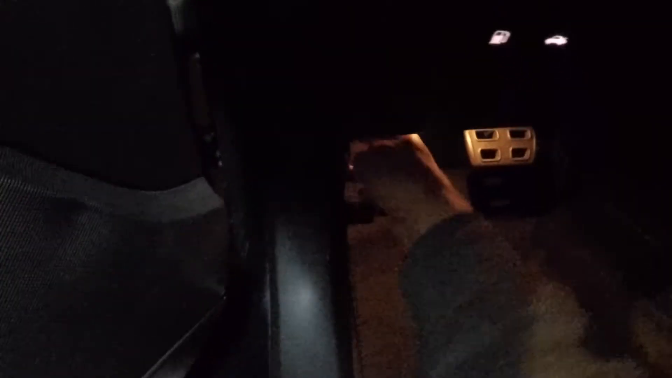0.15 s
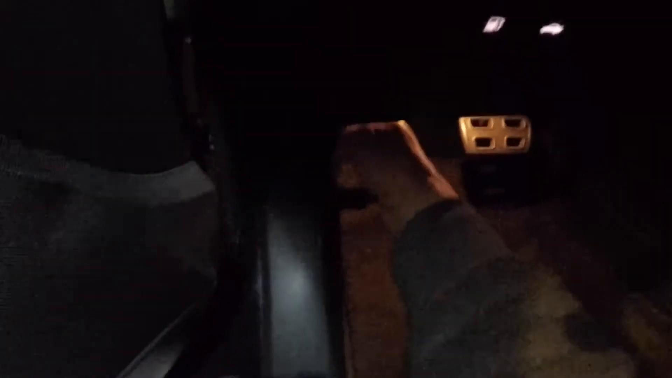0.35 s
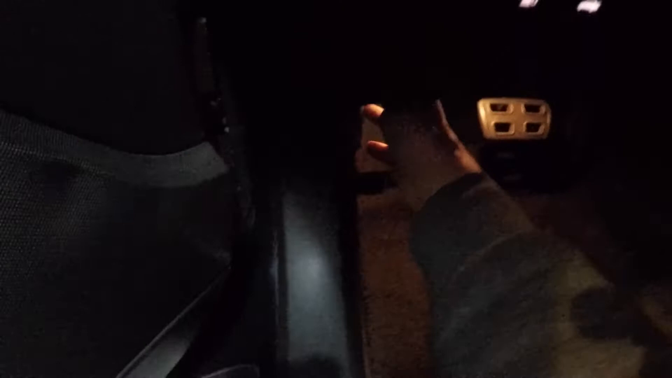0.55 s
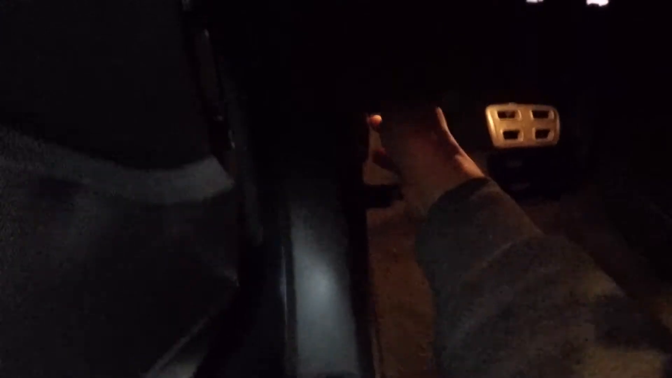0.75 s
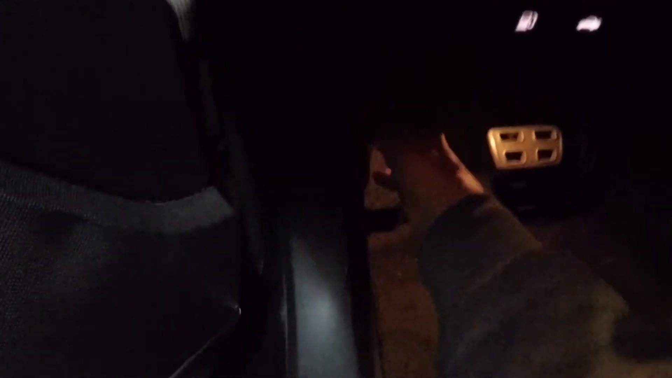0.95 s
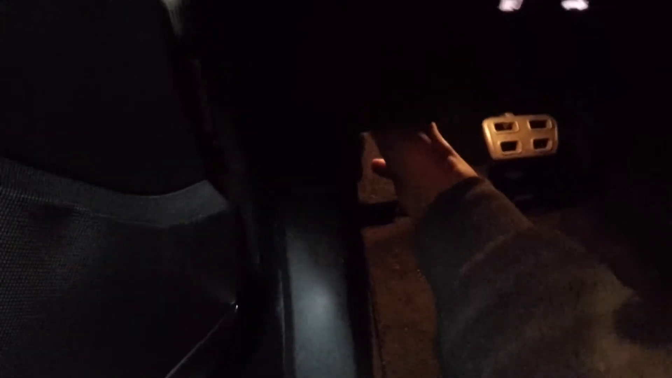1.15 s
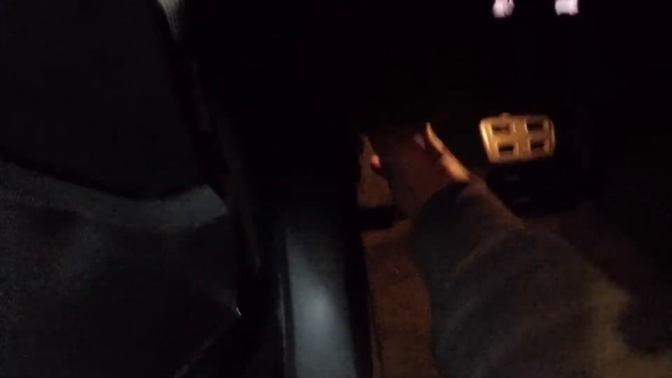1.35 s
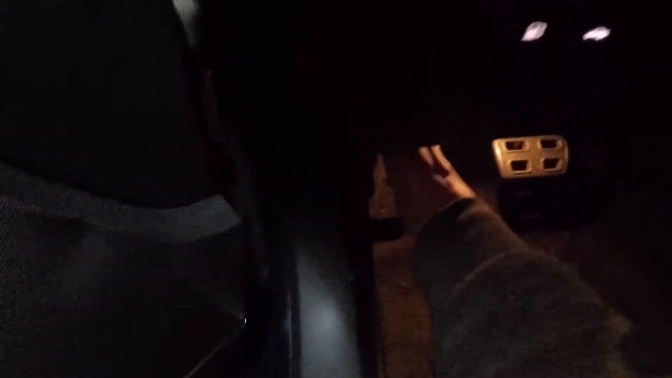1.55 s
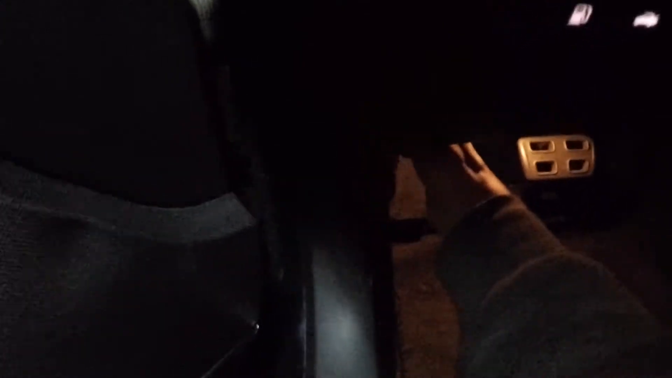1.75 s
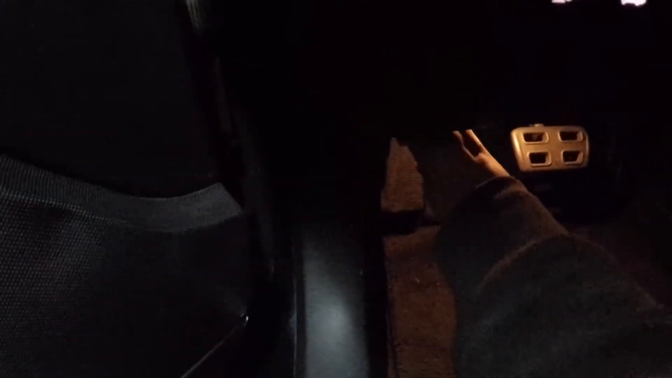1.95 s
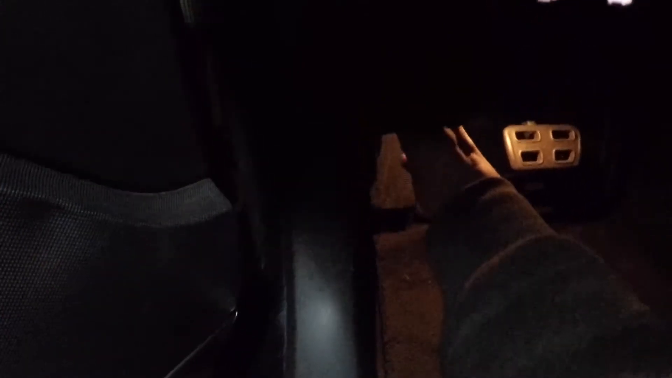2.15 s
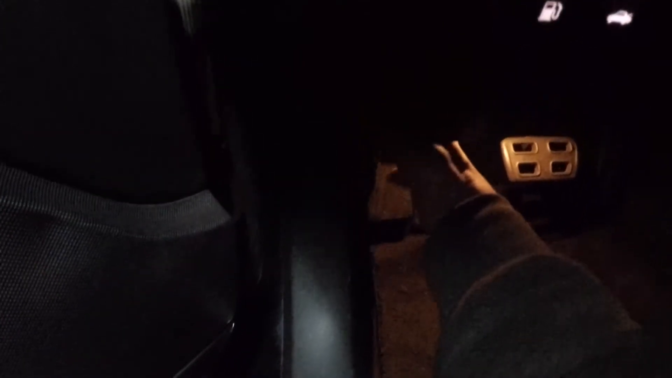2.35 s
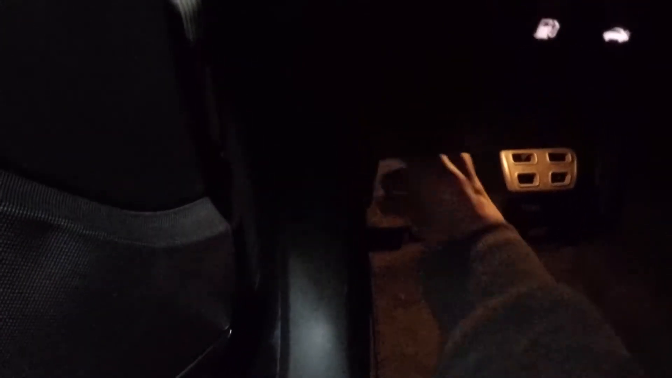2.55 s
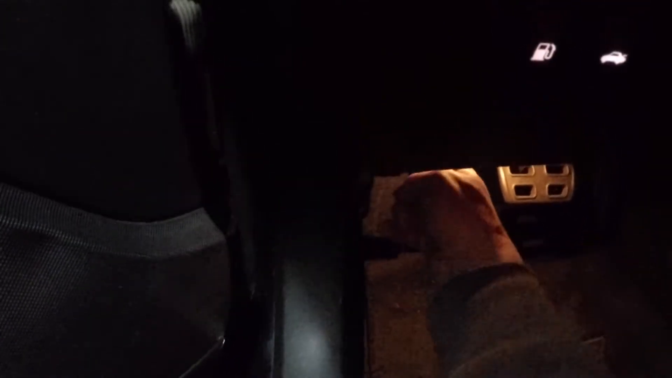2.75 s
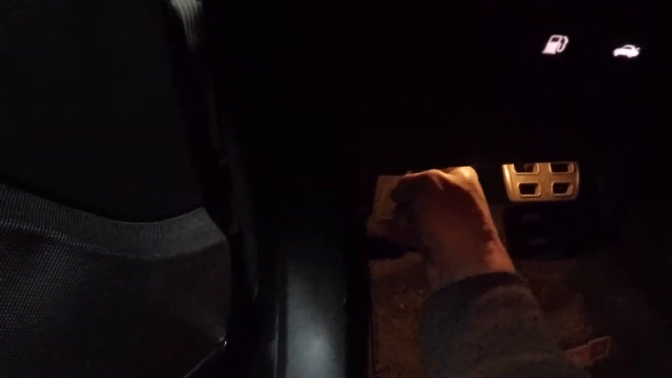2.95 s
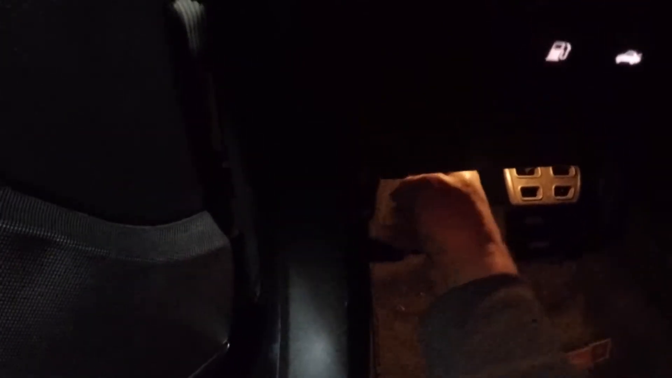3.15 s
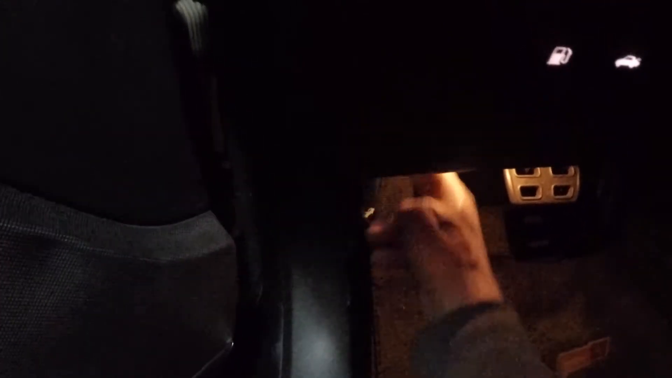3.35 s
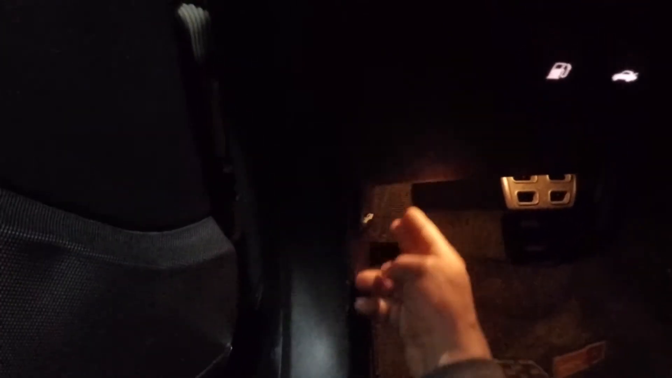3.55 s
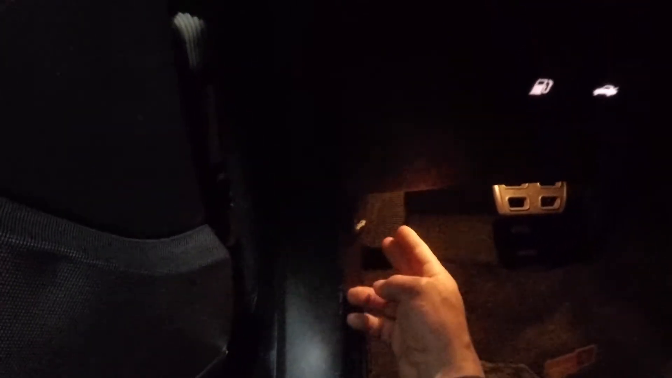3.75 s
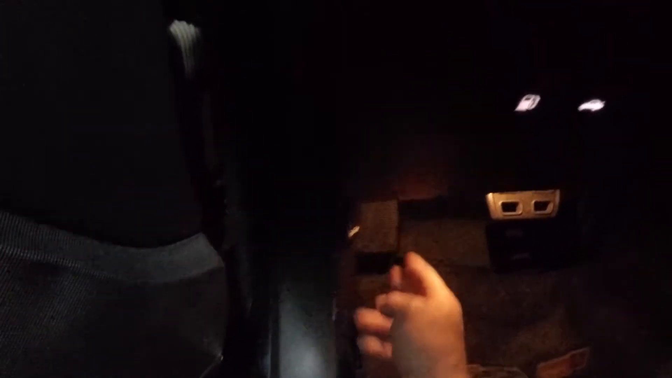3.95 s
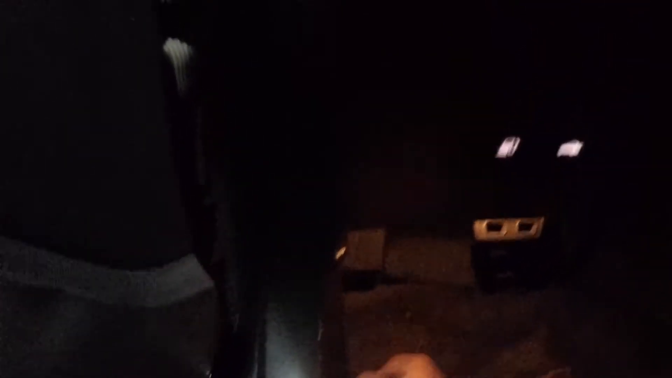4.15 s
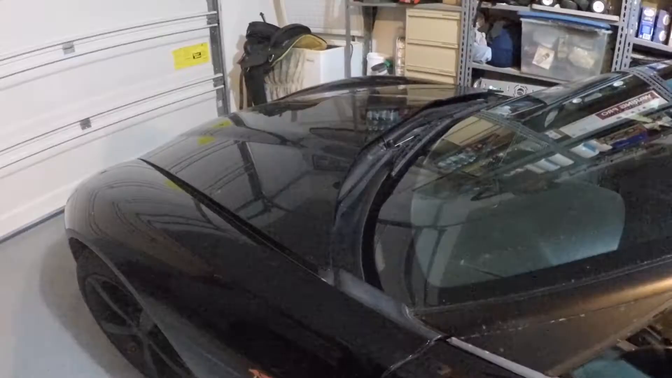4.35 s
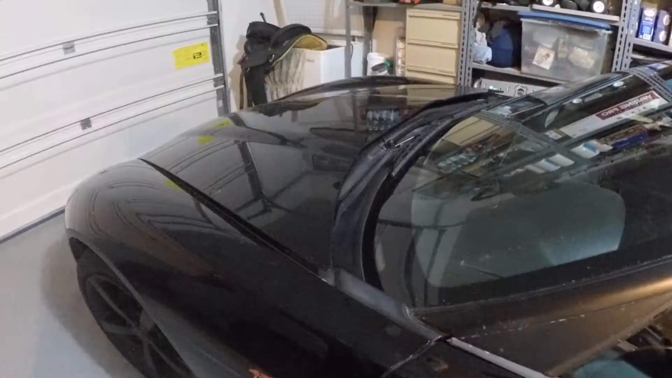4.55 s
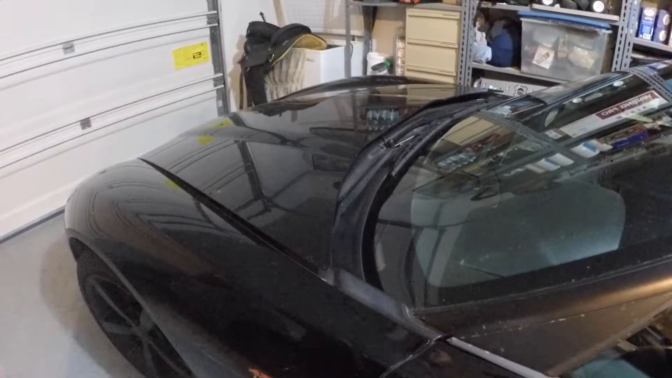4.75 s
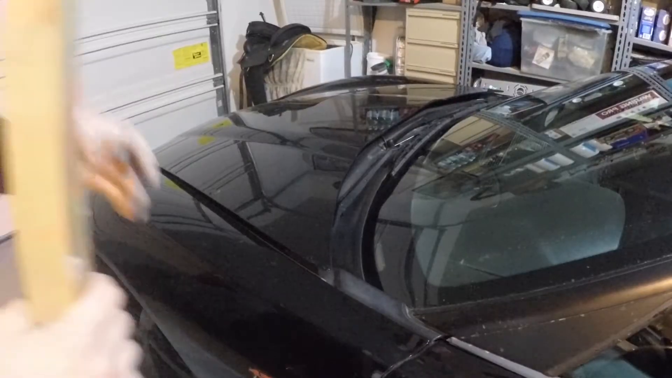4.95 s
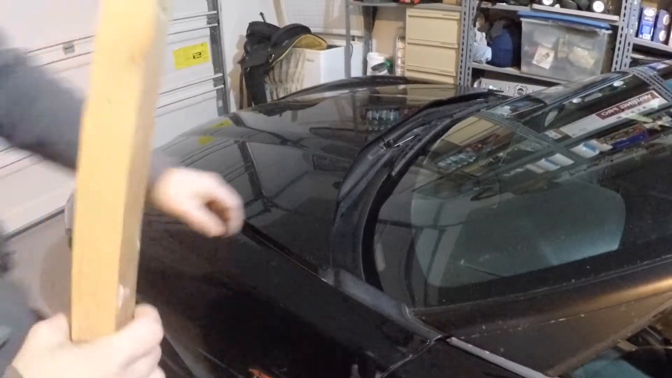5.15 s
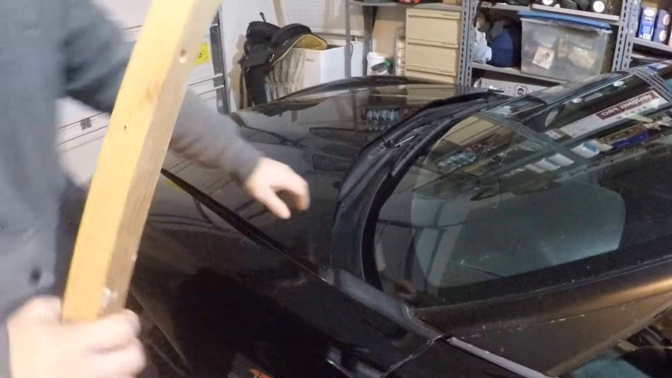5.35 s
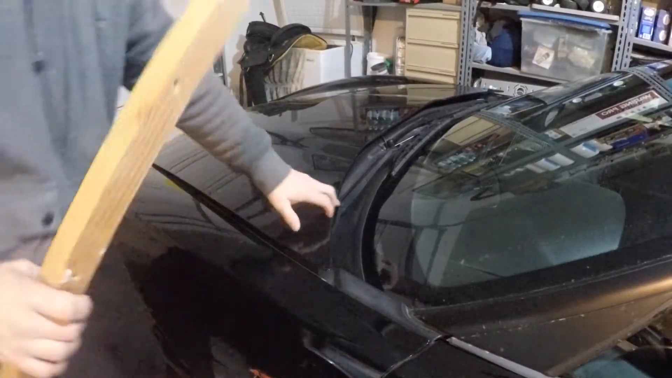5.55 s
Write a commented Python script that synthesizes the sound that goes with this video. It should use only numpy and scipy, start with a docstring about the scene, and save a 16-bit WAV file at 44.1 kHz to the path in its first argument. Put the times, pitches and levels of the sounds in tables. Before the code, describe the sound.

Quiet plastic clicks and handling creaks lead to a booming hood release, a harsh lever crack, then soft shoe steps on concrete.

```python
"""A hand gropes under a car's dashboard in a garage: plastic contacts click as damped noise bursts, the sleeve
rubs as modulated noise, and the grip on the camera creaks in stick-slip ticks and thuds. The cable frees the
latch and the hood jumps up: low panel modes boom while steel clanks, grinds and rattles. The lever then snaps
back on its stop as a hard burst with ringing modes, close enough to overload the microphone. Last, shoes land
and scuff on the concrete as low bursts, broad friction noise and wavering squeaks."""
import sys
import numpy as np
from scipy import signal
from scipy.fft import rfft, irfft, next_fast_len
from scipy.io import wavfile
from scipy.ndimage import map_coordinates

SR = 44100
rng = np.random.default_rng(int(sys.argv[2]) if len(sys.argv) > 2 else 0)


def wav_record(signal):
    """Record a signal, one row per channel, as 16-bit PCM in the file named by sys.argv[1]."""
    frames = np.transpose(np.atleast_2d(signal))
    bounded = np.clip(frames, -1, 1)
    # unit amplitude maps onto the largest positive 16-bit level
    quanta = np.round(bounded * 32767).astype(np.int16)
    wavfile.write(sys.argv[1], SR, quanta)


N = 246519  # length in samples

# the hood jumping against its catch: t/s, boom level/dB, clunk level/dB, clank level/dB, clatter level/dB
HOOD_JOLTS = [(2.5899, -23, -18, -17.5, -39), (2.607, -19.5, -22.5, -26.5, -41),
              (2.632, -24, -27, -31, -41.5), (2.645, -16.5, -31.5, -38, -50), (2.667, -20, -16, -28, -27),
              (2.672, -35, -26, -28.5, -19), (2.7214, -18, -23, -18, -33), (2.7377, -20, -26.5, -26, -33.5),
              (2.7656, -20.5, -36, -33.5, -24), (2.803, -24.5, -38.5, -46.5, -43)]
# spectrum of a plastic click: f/Hz, level/dB
CLICK_COLOUR = [(60, -39.5), (200, -24), (550, 1), (800, -4.5), (1120, 2.5), (1400, 1.5), (1900, -1),
                (2400, -5), (3050, -3), (3600, -18.5), (4600, -13), (8000, -24), (16000, -53)]
# spectrum of a bright snap: f/Hz, level/dB
SNAP_COLOUR = [(1500, -35.5), (4000, -0.5), (6500, -3.5), (10000, -5), (15000, -16.5)]
# spectrum of bright friction hiss: f/Hz, level/dB
HISS_COLOUR = [(1500, -14.5), (3500, 1), (6000, -0.5), (10000, -1.5), (12500, -6), (15500, -9.5)]
# stereo width of the sources at the two microphone ports: f/Hz, side re mid level/dB
PORT_WIDTH = [(30, -4), (100, -12), (300, -20.5), (700, -14.5), (1400, -9.5), (2300, -4.5), (4300, 2),
              (8000, -0.5), (15000, 4)]
# stereo width of still air and handling noise: f/Hz, side re mid level/dB
DIFFUSE_WIDTH = [(30, -2), (100, -7), (300, -8), (1000, -0.5), (2400, -3), (4400, 0), (15000, -0.5)]


def amp(db):
    """Level to amplitude: 20 dB is a factor of ten."""
    return 10 ** (np.asarray(db) / 20)


def unit(x):
    """Normalization to a root-mean-square of 1."""
    return x / np.sqrt(np.mean(x ** 2) + 1e-20)


def along(points, hz):
    """Interpolation of (f/Hz, value) points along a logarithmic frequency axis."""
    f, v = np.transpose(points)
    return np.interp(np.log(hz + 1), np.log(f + 1), v)


def add(track, s, sound):
    """Superposition: a sound is summed into the track from time s."""
    part = track[:, max(round(s * SR), 0):][:, :sound.shape[-1]]
    part += sound[..., :part.shape[1]]


def wobble(rate):
    """Random modulation: straight lines between Gaussian knots, rate knots a second."""
    knots = rng.standard_normal(1024)
    return map_coordinates(knots, [np.arange(N) * rate / SR], order=1, mode="wrap")


def noise(colour, size, width=PORT_WIDTH):
    """Random-phase synthesis: coloured noise of rms 1, with independent mid and side signals."""
    m = next_fast_len(size, real=True)
    hz = np.fft.rfftfreq(m, 1 / SR)
    # the angle shares power between mid and side
    turn = np.arctan(amp(along(width, hz)))
    gain = amp(along(colour, hz)) * [np.cos(turn), np.sin(turn)]
    spectrum = gain * np.exp(2j * np.pi * rng.random(gain.shape))
    mid, side = irfft(spectrum, m)[:, :size]
    return unit(np.array([mid + side, mid - side]))


def burst(colour, t60, rise, size=4096):
    """High modal density: a blow on many close modes is noise that swells quickly and decays exponentially."""
    t = np.arange(size) / SR
    return noise(colour, size) * amp(-60 * t / t60) * (1 - np.exp(-t / rise))


def ring(modes, rise, scatter_db, detune, size=16384):
    """Modal superposition: a blow excites damped sines, each with random level and slight pitch shift."""
    t = np.arange(size) / SR
    hz, db, t60 = np.transpose(modes)[:, :, None]
    level, shift = rng.standard_normal((2, len(modes), 1))
    envelope = amp(db + scatter_db * level - 60 * t / t60)
    waves = envelope * np.sin(2 * np.pi * hz * (1 + detune * shift) * t)
    return waves.sum(0) * (1 - np.exp(-t / rise))


def arch(start, length):
    """Stroke pressure: the square root of half a sine swells and eases off."""
    phase = np.clip((np.arange(N) / SR - start) / length, 0, 1)
    return np.sqrt(np.abs(np.sin(np.pi * phase)))


def hood():
    """Impact excitation: the spring throws the hood at its safety catch; panel modes boom, steel clatters."""
    # modes of the hood panel: f/Hz, level/dB, t60/s
    panel_modes = [(26.7, 0, 0.16), (44.8, -10, 0.29), (65.6, -4, 0.18), (78.8, 1, 0.23), (105.3, -1, 0.15),
                   (239.4, -13, 0.18), (329, -23.5, 0.27)]
    # spectrum of the dull clunk: f/Hz, level/dB
    clunk_colour = [(30, -0.5), (120, 0.5), (250, 0.5), (480, -2.5), (620, -8.5), (760, -7), (950, -13.5),
                    (1140, -11.5), (1400, -19), (2200, -21), (3500, -26.5), (8000, -34.5), (16000, -59.5)]
    # modes of the steel catch: f/Hz, level/dB, t60/s
    catch_modes = [(230, -3.5, .22), (414, -5, 0.059), (459.4, -4, .15), (723, -8.5, .15),
                   (1145, -11.5, .15), (1810, -18, 0.18), (2100, -18, 0.15), (3060, -20, 0.09)]
    # spectrum of steel meeting steel: f/Hz, level/dB
    clank_colour = [(200, -18.5), (500, -5), (760, 5), (930, -2.5), (1130, -3.5), (1450, -9.5), (1900, -10),
                    (2600, -20.5), (5000, -35), (15000, -52)]
    # spectrum of the clatter: f/Hz, level/dB
    clatter_colour = [(300, -20), (900, -8.5), (1700, 0.5), (2500, -3), (3050, 0.5), (3800, -5),
                      (4500, 0.5), (6500, -4), (9000, -3), (12000, -11.5), (15500, -13.5)]
    # modes of the latch's pawl and spring: f/Hz, level/dB, t60/s
    pawl_modes = [(1240, -6.5, .14), (1470, -6.5, .22), (1809, -6.5, .25), (2126, -2.5, .25),
                  (2600, -7.5, 0.13), (2870, -6.5, 0.17), (3106, -1, .16), (4450, -6, 0.073),
                  (5100, -8, .08)]
    catch_db, pawl_db = -7.5, -15  # ring gains added to the clunk and clatter levels

    panel, steel = np.zeros((2, N)), grinding()
    for s, boom_db, clunk_db, clank_db, clatter_db in HOOD_JOLTS + rebounds(count=2):
        add(panel, s, amp(boom_db) * ring(panel_modes, rise=0.007, scatter_db=4.5, detune=0.0037))
        add(steel, s, amp(clunk_db - 1.5) * burst(clunk_colour, t60=0.16, rise=.002, size=16384))
        add(steel, s, amp(clunk_db + catch_db) * ring(catch_modes, rise=0.0014, scatter_db=1.5, detune=0.0025))
        add(steel, s, amp(clank_db) * burst(clank_colour, t60=0.07, rise=0.0036))
        add(steel, s, amp(clatter_db - 1) * burst(clatter_colour, t60=0.055, rise=0.002))
        add(steel, s, amp(clatter_db + pawl_db) * ring(pawl_modes, rise=0.001, scatter_db=1.5, detune=0.0017))
    # the raised hood sways once more, very low, as it settles
    sway = ring([(46, 0.0013, 0.33)], rise=0.0074, scatter_db=3.0, detune=.01)
    add(panel, 2.956, amp(-19.0) * sway)
    return panel + steel + amp(-11.0) * garage(steel, build=0.0081)


def rebounds(count):
    """Inelastic rebound: after its last jolt the hood bounces on the catch, softer each time; rows like jolts."""
    rebound_s, boom_loss_db, steel_loss_db = .046, 4, 10  # interval; losses per rebound
    s, boom_db, *steel_db = HOOD_JOLTS[-1]
    rows = []
    for k in range(1, count + 1):
        softer_steel = [db - k * steel_loss_db for db in steel_db]
        rows.append((s + k * rebound_s, boom_db - k * boom_loss_db, *softer_steel))
    return rows


def grinding():
    """Dry friction: steel scrapes and rattles as the hood rises; each clatter can renew the drag on the catch."""
    # spectrum of grinding steel: f/Hz, level/dB
    grit_colour = [(300, -14), (750, -5.5), (1150, -2.5), (1400, -9), (2100, 1.5), (3000, -8.5),
                   (4000, -10.5), (6000, -10.5), (9500, -11.5), (12000, -18), (15500, -34)]
    # spectrum of the loose parts' crowded modes: f/Hz, level/dB
    rattle_colour = [(400, -19.5), (1100, -2.5), (1400, -6), (1650, -1.5), (2150, -0.5), (2500, -3.5),
                     (3050, -4), (3700, -9.5), (4450, -1.5), (6000, -8), (14000, -21)]
    # the striker sliding up the catch: t/s, length/s, level/dB
    striker_slide = (2.672, 0.13, -36)
    # spectrum of that slide's bright hiss: f/Hz, level/dB
    scrape_colour = [(1200, -20.5), (3000, -2), (3800, -7), (4500, 0), (6500, -1.5), (9000, -2),
                     (11500, -9), (13500, -8.5), (15500, -15.5)]
    start_s, attack_s, hold_s = 2.58, .014, 0.088  # the hold counts from the start
    grind_db, fall_db_per_s, rough_db = -41.5, 169, 2.5
    drag_db, drag_t60_s = -14, 0.16  # gain added to the clatter level, and decay
    rattle_db = -1

    t = np.arange(N) / SR
    since = t - start_s
    fall_db = fall_db_per_s * np.maximum(since - hold_s, 0)
    force = np.clip(since / attack_s, 0, 1) * amp(grind_db - fall_db)
    for s, *_, clatter_db in HOOD_JOLTS:
        drag = (t > s) * amp(clatter_db + drag_db - 60 * np.abs(t - s) / drag_t60_s)
        force = np.maximum(force, drag)
    rough = amp(rough_db * wobble(350))
    start, length, scrape_db = striker_slide
    scrape = amp(scrape_db) * arch(start, length) * noise(scrape_colour, size=N)
    rattle = amp(rattle_db) * chatter() * noise(rattle_colour, size=N)
    return force * (rough * noise(grit_colour, size=N) + rattle) + rough * scrape


def chatter():
    """Shot process: loose parts knock at chance moments, each knock decaying exponentially; rms 1."""
    knocks_per_s, fade_s = 140, 0.0018  # mean rate; time constant
    knocks = (rng.random(N) < knocks_per_s / SR) * rng.random(N)
    return unit(signal.lfilter([1], [1, -np.exp(-1 / (fade_s * SR))], knocks))


def lever():
    """Impulsive contact: the lever slams on its stop with a hard crack; dashboard and spring modes ring on."""
    # the lever slams home, bounces and rattles to rest: t/s, crack level/dB, dashboard level/dB
    slams = [(3.2793, 1.5, -15), (3.2828, -2.5, -12.5), (3.288, -10.5, -6), (3.2916, -17, -14.5),
             (3.317, -26.5, -21.5), (3.33, -29.5, -21.5), (3.361, -39, -27.5), (3.393, -40, -30)]
    # the lever brushing its guide before the slam: t/s, level/dB, hiss re that level/dB
    guide_brush = (3.2705, -21.5, -10.5)
    # spectrum of the hard crack: f/Hz, level/dB
    crack_colour = [(100, -19.5), (700, -4.5), (1100, -0.5), (1300, -6.5), (1580, -1.5), (1790, 0.5),
                    (2050, 4.5), (2350, -4.5), (3050, -3.5), (3600, -11), (4100, -5), (6200, -5),
                    (8500, -4), (11000, -5), (15500, -20.5)]
    # spectrum of the struck dashboard: f/Hz, level/dB
    dash_colour = [(30, -10.5), (100, -4), (250, -3), (400, 1.5), (600, -6), (780, -5.5), (1080, -1),
                   (1350, -9.5), (2000, -12), (3500, -23), (9000, -23.5), (16000, -42.5)]
    # modes of lever, spring and dashboard: f/Hz, level/dB, t60/s
    lever_modes = [(45, -31.5, 1), (79.5, -24.5, .65), (102.2, -30, 1), (248, -19.5, 0.34),
                   (331.3, -24, 0.52), (368, -14.5, 0.2), (457.6, -14, 0.15), (488, -19.5, 0.22),
                   (550, -26, 0.49), (653.7, -24.5, 0.2), (823, -15, .25), (957, -26.5, 0.22),
                   (1098, -11, 0.089), (1130, -35, 0.72), (1790, -12, 0.045), (1850, -52.5, 1.6),
                   (1920, -11, 0.11), (2096, -15, 0.084), (2020, -52.5, 1.8), (2494, -22.5, 0.098),
                   (3720, -15.5, .035), (6660, -17, .03)]
    # spectrum of the return spring's many close modes: f/Hz, level/dB
    spring_colour = [(600, -39), (790, -21), (850, 1), (925, -1.5), (985, -18.5), (1130, -12),
                     (1300, -34.5), (2500, -45), (6000, -70)]
    # spectrum of the slam's echo in the garage: f/Hz, level/dB
    slam_echo_colour = [(40, -2.5), (100, -2), (250, 2.5), (400, -2), (620, -4), (850, -0.5), (1080, -5.5),
                        (1350, -13), (2000, -10), (2900, -13.5), (3700, -22.5), (5500, -19.5), (9000, -20),
                        (11500, -24), (15000, -37)]

    out, home = np.zeros((2, N)), slams[0][0]
    start, brush_db, hiss_db = guide_brush
    body = swell(CLICK_COLOUR, start, home, growth_db=8.5)
    hiss = swell(SNAP_COLOUR, start, home, growth_db=10.5)
    add(out, start, amp(brush_db) * (body + amp(hiss_db) * hiss))
    for s, crack_db, dash_db in slams:
        add(out, s, amp(crack_db) * burst(crack_colour, t60=0.044, rise=0.0003))
        add(out, s, amp(dash_db) * burst(dash_colour, t60=.085, rise=0.0032, size=16384))
    tone = ring(lever_modes, rise=0.0018, scatter_db=0.5, detune=0.0025, size=SR)
    add(out, home, from_right(tone, lag_s=.0001))
    add(out, home, amp(-42) * burst(spring_colour, t60=1.6, rise=.005, size=SR))
    add(out, home, amp(14.5) * echo(slam_echo_colour, build=0.0079))
    return out


def swell(colour, start, end, growth_db):
    """Sliding friction: noise grows exponentially as the part speeds up, loudest at its end."""
    size = max(round((end - start) * SR), 64)
    return noise(colour, size=size) * amp(np.linspace(-growth_db, 0, size))


def from_right(x, lag_s):
    """Path difference: sound from the right reaches the left port slightly later."""
    t = np.arange(len(x)) / SR
    return np.array([np.interp(t - lag_s, t, x, left=0), x])


def fingers():
    """Contact stiffness: a harder touch on plastic gives more bright snap and less low knock."""
    # fingers on the lever and its play: t/s, level/dB, hardness (0 fingertip - 1 nail), ring f/Hz, ring level/dB
    clicks = [(0.002, -30, 0.6, 690, -8), (0.175, -39, .15, 630, -14), (0.229, -42.5, 0.64, 1900, -14),
              (0.744, -40.5, 0.5, 1100, -17), (1.039, -34, 0.52, 2580, -7), (1.049, -39, 0.48, 2600, -8),
              (1.4896, -31, 0.91, 1970, -4), (1.511, -29, 0.89, 2040, -4), (1.535, -35.5, 0.18, 900, -13),
              (1.58, -24, 0.3, 1860, -8), (1.686, -37, 0.23, 1910, -7), (1.736, -34.5, 0.32, 1129, -5),
              (2.006, -28.5, 0.5, 2400, -8.5), (2.095, -35.5, 0.62, 2460, -10),
              (2.108, -30.5, 0.5, 1520, -11), (2.152, -19, 0.54, 2000, -11), (2.186, -26, 0.65, 2040, -5.5),
              (2.255, -24, 0.23, 1190, -10), (2.368, -25.5, 0.55, 1900, -10), (2.413, -33, 0.17, 1160, -12),
              (2.563, -36, 0.16, 1400, -14), (3.122, -33, .0, 1050, -6.5), (3.157, -37, 0.14, 1500, -17),
              (3.176, -36.5, 0, 1400, -18), (3.2149, -21, 0.74, 2310, -17), (3.527, -31, 0.54, 1203, -15)]
    # ticks of small loose parts: t/s, level/dB, f/Hz
    ticks = [(0.932, -50.5, 2380), (1.323, -34, 13200), (1.491, -29, 6700), (1.82, -49, 4510),
             (1.843, -53, 4000), (1.895, -46.5, 4007), (1.909, -45, 4200), (1.946, -55, 3500),
             (1.966, -49, 3000), (2.024, -44, 3500), (2.126, -50, 4000), (2.136, -49, 4000),
             (2.149, -35, 2480), (2.499, -43, 5800), (3.527, -45.5, 7100), (4.155, -44, 8965),
             (5.222, -48, 4500), (5.368, -52, 6000), (5.416, -37, 9800)]
    # spectrum of a knock on the trim: f/Hz, level/dB
    knock_colour = [(40, -23.5), (120, -12.5), (240, -3.5), (370, -2.5), (540, -9), (900, -13),
                    (3000, -59.5)]
    knock_db, knock_loss_db = 5, 16  # a fingertip's knock, and how much less a nail gives
    snap_db, snap_gain_db = -25.5, 30  # a fingertip's snap, and how much more a nail gives

    out = np.zeros((2, N))
    for s, db, hardness, hz, ring_db in clicks:
        knock = amp(knock_db - knock_loss_db * hardness ** 2) * burst(knock_colour, t60=0.067, rise=0.012)
        click = amp(-6.5) * burst(CLICK_COLOUR, t60=0.042, rise=0.0017)
        band = [(hz / 2, -26), (hz / 1.25, -7), (hz, 0), (hz * 1.45, -6), (hz * 2, -24)]
        tone = amp(ring_db) * burst(band, t60=0.04, rise=0.0015)
        snap = amp(snap_db + snap_gain_db * hardness) * burst(SNAP_COLOUR, t60=.029, rise=0.0023)
        add(out, s, amp(db) * (knock + click + tone + snap))
    for s, db, hz in ticks:
        band = [(hz / 4, -19), (hz / 1.9, -9), (hz, 0), (hz * 2, -6), (hz * 5, -24)]
        add(out, s, amp(db + 4.5) * burst(band, t60=0.02, rise=0.001))
    return out + amp(-17.0) * garage(out, build=0.0083)


def slides():
    """Rough-surface friction: fingers stroke grained plastic, pressure times a fast random unevenness."""
    # fingers sliding over the trim: t/s, length/s, level/dB
    strokes = [(1.595, 0.055, -47.5), (1.727, 0.031, -47), (1.763, 0.027, -52), (2.246, 0.054, -40.5),
               (2.313, 0.064, -44.5), (3.912, 0.036, -44.5)]
    # spectrum of rubbed plastic: f/Hz, level/dB
    grain_colour = [(150, 14), (400, 2), (750, 5), (1150, 5), (1500, -1), (2100, -1.5), (3000, -8.5),
                    (3800, -14), (6000, -18), (11000, -29.5), (15000, -60)]
    pressure = sum(amp(db) * arch(s, length) for s, length, db in strokes)
    friction = noise(grain_colour, size=N) + amp(-10.5) * noise(HISS_COLOUR, size=N)
    return pressure * amp(2.2 * wobble(400)) * friction


def squeaks():
    """Friction-excited tone: skin on the lever sings in a narrow noise band with a weak overtone and hiss."""
    # squeaks of skin on the lever: t/s, length/s, level/dB, f/Hz
    tones = [(2.471, 0.02, -41.5, 1130), (2.472, 0.012, -44, 2220), (2.492, 0.02, -42, 1545),
             (3.257, .014, -45.5, 2380)]
    out = np.zeros((2, N))
    for s, length, db, hz in tones:
        colour = [(hz / 2, -36), (hz / 1.1, -19), (hz, 0), (hz * 1.14, -19),
                  (hz * 2, -17), (hz * 3, -24), (hz * 8, -36)]
        size = round(length * SR)
        add(out, s, amp(db) * noise(colour, size=8192)[:, :size] * np.sqrt(np.hanning(size)))
    return out


def shoes():
    """Impact, then stick-slip: soft soles land on concrete and twist with short, wavering squeaks."""
    # footfalls: t/s, level/dB
    steps = [(4.602, -40.5), (4.65, -44), (5.311, -37), (5.352, -42.5)]
    # spectrum of a landing sole: f/Hz, level/dB
    shoe_colour = [(50, 3), (130, -1), (230, -10), (330, -2), (570, 0.5), (900, -10.5), (2000, -28),
                   (6000, -44), (16000, -48)]
    # modes of the heel's hollow knock: f/Hz, level/dB, t60/s
    heel_modes = [(154, -7.5, 0.16), (314.4, -5.5, 0.12), (561, -6, 0.082)]
    # soles twisting on the floor: t/s, level/dB
    scuffs = [(4.6, -51.5), (4.715, -51.5), (5.385, -48)]
    # spectrum of rubber scuffing on concrete: f/Hz, level/dB
    scuff_colour = [(400, -29), (900, -1), (1600, -5), (1880, -3), (2150, -5), (4500, -8), (6000, -7),
                    (7800, -8), (9200, -3), (10200, -4), (11500, -6), (15000, -21)]
    # squeaks of a twisting sole: t/s, length/s, level/dB, f/Hz, glide as a share of the pitch
    sole_squeaks = [(4.612, .058, -53.5, 1835, -0.0126), (4.729, .045, -58, 1930, -0.049)]
    waver, overtone, overtone_db = 0.027, 5, -2  # pitch scatter as a share; number and level of the overtone

    out = np.zeros((2, N))
    for s, db in steps:
        add(out, s, amp(db) * burst(shoe_colour, t60=0.076, rise=0.0042, size=16384))
        add(out, s, amp(db - 3.5) * ring(heel_modes, rise=0.0038, scatter_db=3.0, detune=0.033))
    for s, db in scuffs:
        add(out, s, amp(db + 12.5) * burst(scuff_colour, t60=0.26, rise=0.062, size=16384))
    for s, length, db, hz, glide in sole_squeaks:
        size = round(length * SR)
        pitch = hz * (1 + glide * np.linspace(0, 1, size) + waver * wobble(700)[:size])
        phase = 2 * np.pi * np.cumsum(pitch) / SR
        tone = np.sin(phase) + amp(overtone_db) * np.sin(overtone * phase)
        add(out, s, amp(db) * np.sqrt(np.hanning(size)) * tone)
    return out + amp(-6.5) * garage(out, build=0.0066)


def clothes():
    """Incoherent friction: cloth rubs and hisses with each stroke of arm or body; powers add."""
    # strokes of the sleeve: t/s, length/s, rub level/dB, hiss re rub level/dB, unevenness level/dB
    moves = [(0.0, 0.35, -56.5, -10, 2.5), (0.887, 1, -64, -7, 5), (1.57, 0.46, -56, -24, 3),
             (2.26, 0.16, -48, -11, 1.5), (2.43, 0.35, -54.5, -27, 6), (3.401, 0.55, -63.5, -16.5, 2.5),
             (3.874, 0.087, -53.5, -1, 0.5), (3.941, 0.42, -56, -2, 2), (4.549, 0.29, -65.5, -4, 4),
             (5.3, 0.39, -61.5, 6.5, 2.5)]
    # spectrum of rubbing cloth: f/Hz, level/dB
    cloth_colour = [(200, -14.5), (450, 1.5), (900, -0.5), (1400, -4), (2100, -6.5), (3500, -15.5),
                    (6000, -23), (16000, -50)]
    still_rub_db, still_hiss_db = -65, -71.5  # while the arm rests

    rub, hiss, catches = amp(still_rub_db), amp(still_hiss_db), wobble(130)
    for s, length, db, hiss_db, uneven_db in moves:
        stroke = amp(db + uneven_db * catches) * arch(s, length)
        rub = np.hypot(rub, stroke)
        hiss = np.hypot(hiss, amp(hiss_db) * stroke)
    return rub * noise(cloth_colour, size=N) + hiss * noise(HISS_COLOUR, size=N)


def rubs():
    """Amplitude-modulated friction: fabric over an edge catches unevenly in one broad band of pitch."""
    # fabric dragged over an edge: t/s, length/s, level/dB, f/Hz
    drags = [(0.075, .1, -54, 900), (1.597, 0.044, -49, 1390), (2.316, 0.054, -48, 2000),
             (4.09, 0.12, -60.5, 1700), (4.211, 0.14, -55.5, 1910), (5.18, 0.091, -59, 1900),
             (5.367, .05, -56.5, 2300)]
    out = np.zeros((2, N))
    for s, length, db, hz in drags:
        colour = [(hz / 4, -22), (hz / 2.1, -7), (hz, 0), (hz * 1.57, -7), (hz * 1.9, -18), (hz * 6, -32)]
        size = round(length * SR)
        catches = amp(3 * wobble(299)[:size])
        add(out, s, amp(db) * np.sqrt(np.hanning(size)) * catches * noise(colour, size=16384)[:, :size])
    return out


def grip():
    """Stick-slip: skin slips on the camera's shell with a crisp tick, then a soft thud, over the hand's rumble."""
    # single slips of the grip: t/s, tick level/dB, thud level/dB
    slips = [(0.1759, -44, -42), (0.4473, -43, -48), (0.4851, -53, -51), (0.5043, -46, -45.5),
             (0.5547, -52, -45), (0.5934, -50, -45), (0.6154, -51, -48.5), (0.7448, -42, -46.5),
             (0.82, -41, -50), (0.8676, -48, -52), (0.8901, -46, -48), (0.9328, -38.5, -49),
             (0.958, -46, -46), (0.9804, -48, -45), (1.0075, -44, -40), (1.0778, -36, -39),
             (1.1016, -35.5, -39), (1.1309, -37.5, -39.5), (1.1604, -53, -47), (1.8306, -44, -44),
             (1.8606, -50, -46), (1.8957, -41, -45), (1.9097, -43, -46), (1.9473, -42, -42),
             (2.5356, -53, -43), (3.0284, -51, -46), (3.0546, -58, -43.5), (3.5816, -46.5, -41.5),
             (3.6144, -48, -42.5), (3.647, -45, -48), (3.685, -48, -42), (3.712, -49, -42),
             (3.7389, -47, -44), (3.7764, -43, -38.5), (3.7987, -46, -44.5), (3.8137, -45, -49),
             (3.829, -43, -43), (3.8447, -44, -46), (3.8638, -50.5, -48.5), (3.886, -38.5, -42.5),
             (3.9977, -45, -45), (4.0276, -50, -45.5)]
    # modes of the camera's shell: f/Hz, level/dB, t60/s
    shell_modes = [(1116, 1.5, 0.023), (1380, -4, 0.021), (2100, -4, 0.017), (3080, -8.5, 0.021)]
    # low modes of the camera's body: f/Hz, level/dB, t60/s
    thud_modes = [(105.7, -3.5, 0.11), (232.6, 1, 0.042), (335, -2, 0.038)]
    # spectrum of the hand's rumble: f/Hz, level/dB
    handling_colour = [(24, -31.5), (40, -6), (107, 0.5), (141, -6.5), (226, -5), (506, -23.5),
                       (600, -22.5), (780, -50), (1320, -120)]
    rest_db, slip_rumble_db = -57.5, -15.5  # rumble at rest; gain added to a slip's thud level
    spread_s, thud_lag_s = 0.072, 0.0026  # rumble's reach before and after a slip; the body follows later

    out, effort = np.zeros((2, N)), np.full((1, N), amp(rest_db))
    push = np.hanning(round(2 * spread_s * SR))
    for s, tick_db, thud_db in slips:
        shell = ring(shell_modes, rise=.0006, scatter_db=1.5, detune=0.031, size=4096)
        add(out, s, amp(tick_db - 3.5) * shell)
        click = burst(CLICK_COLOUR, t60=0.032, rise=0.0009)
        snap = amp(-5.5) * burst(SNAP_COLOUR, t60=0.027, rise=.001)
        add(out, s, amp(tick_db - 10) * (click + snap))
        thud = ring(thud_modes, rise=0.00077, scatter_db=3.0, detune=0.063, size=4096)
        add(out, s + thud_lag_s, amp(thud_db + 4.5) * thud)
        add(effort, s - spread_s, amp(thud_db + slip_rumble_db) * push)
    return out + effort * amp(2.0 * wobble(36)) * noise(handling_colour, size=N, width=DIFFUSE_WIDTH)


def garage(x, build):
    """Linear room response: the left signal convolved with a two-port echo of the walls."""
    # spectrum of the walls' echo: f/Hz, level/dB
    walls_colour = [(40, -3.5), (200, 5), (450, -2.5), (900, -4), (1350, -2), (2300, -5), (3700, -6),
                    (8000, -3), (11000, -2), (15000, -14)]
    return signal.fftconvolve(x[:1], echo(walls_colour, build), axes=1)[:, :N]


def echo(colour, build):
    """Diffuse reverberation: noise builds up, then decays by frequency; the left port has energy 1."""
    # reverberation time of the garage: f/Hz, t60/s
    garage_t60 = [(60, 0.45), (250, 0.49), (1000, 0.47), (2500, 0.53), (5000, 0.54), (9000, 0.42),
                  (15000, 0.27)]
    hz, t, z = signal.stft(noise(colour, size=SR), SR, nperseg=256)
    decay = amp(-60 * t / along(garage_t60, hz)[:, None])
    tail = signal.istft(z * decay * (1 - np.exp(-t / build)), SR, nperseg=256)[1]
    return tail / np.linalg.norm(tail[0])


def scene():
    """Linear superposition: all sources over the garage's still air."""
    # spectrum of the still air: f/Hz, level/dB
    air_colour = [(12, -31), (20, 5), (39, 2), (119, -10.5), (225, -27), (297, -15.5), (476, -26),
                  (1910, -27.5), (3520, -33), (10100, -34.5), (14100, -36.5), (15400, -47.5)]
    air = amp(-49.5) * noise(air_colour, size=N, width=DIFFUSE_WIDTH)
    handle = lever() + fingers() + slides() + squeaks()
    return air + hood() + handle + shoes() + clothes() + rubs() + grip()


def record(dry, top=0.99, hardness=8):
    """Saturation and band limit: the input stage flattens the loudest peaks, then a steep low-pass follows."""
    top_hz = 15700
    clipped = dry / (1 + np.abs(dry / min(top, 1)) ** hardness) ** (1 / hardness)
    m = next_fast_len(N + 4096, real=True)
    low_pass = 1 / (1 + (np.fft.rfftfreq(m, 1 / SR) / top_hz) ** 100)
    return irfft(rfft(clipped, m) * low_pass, m)[:, :N]


dry = scene()
out = record(dry)
wav_record(out)
```